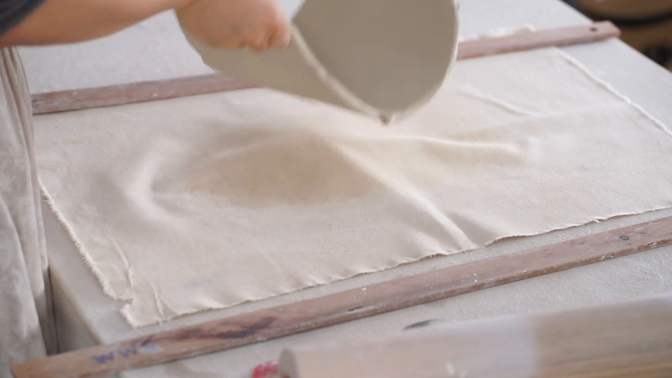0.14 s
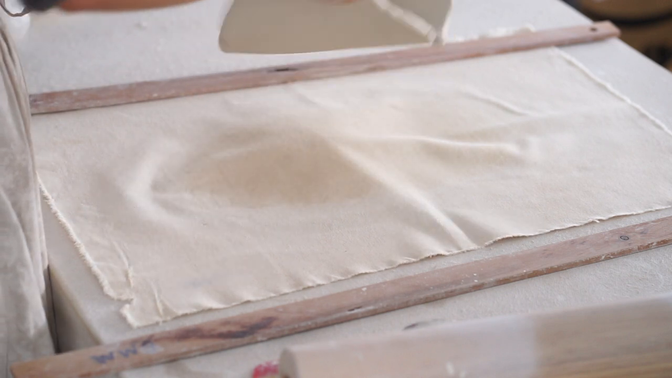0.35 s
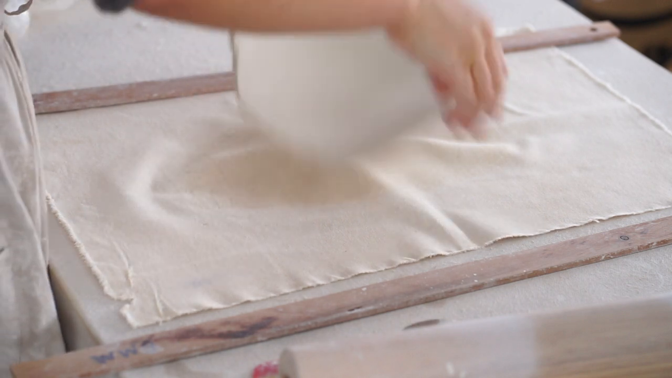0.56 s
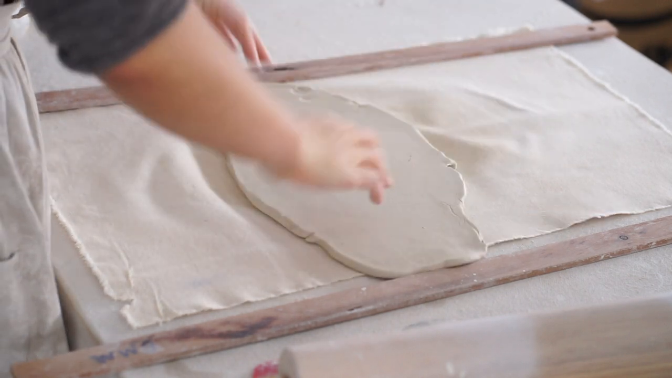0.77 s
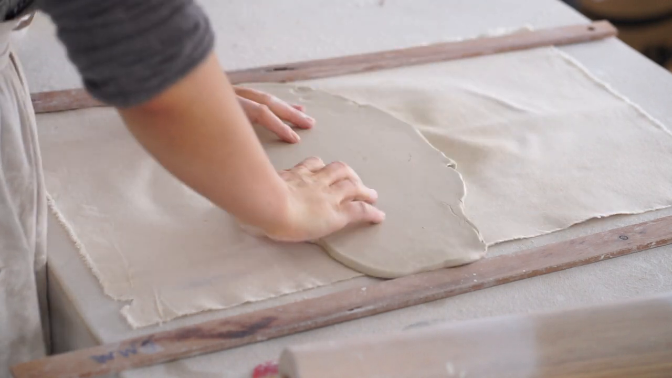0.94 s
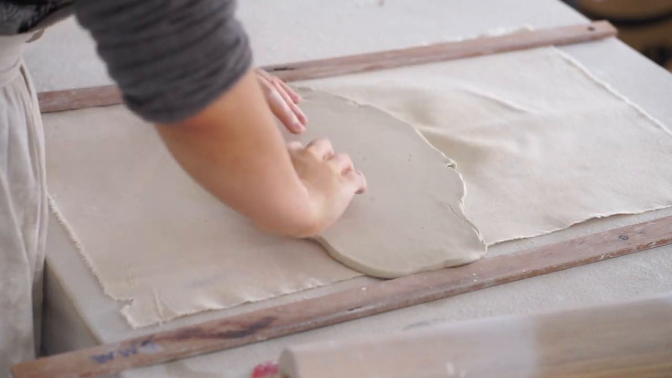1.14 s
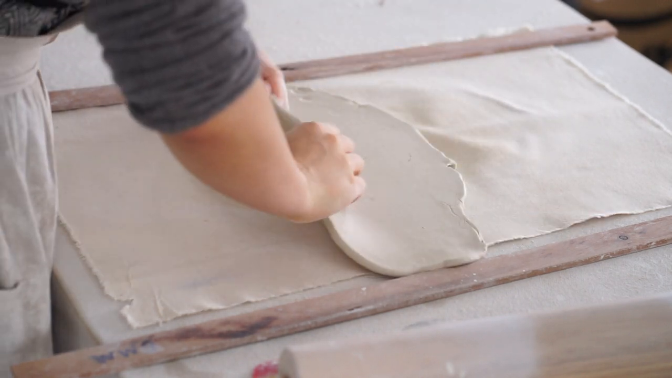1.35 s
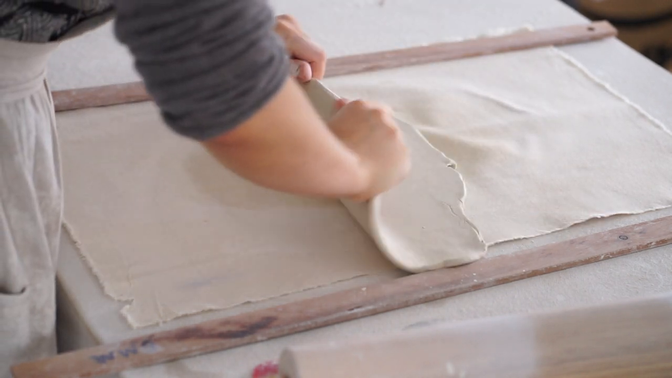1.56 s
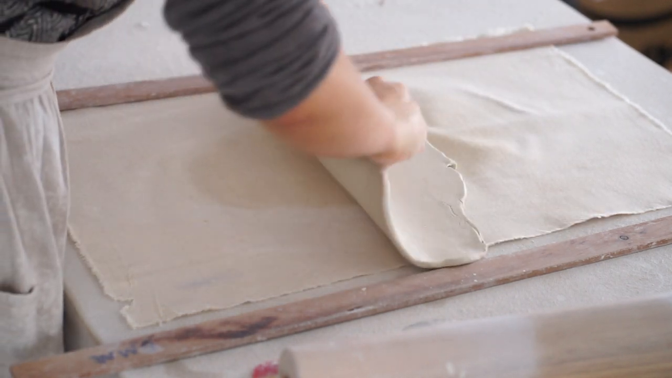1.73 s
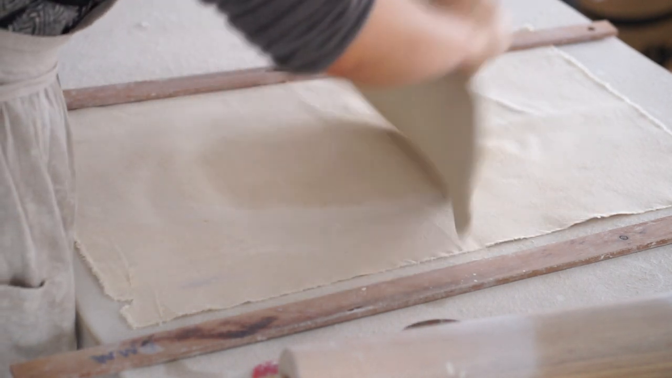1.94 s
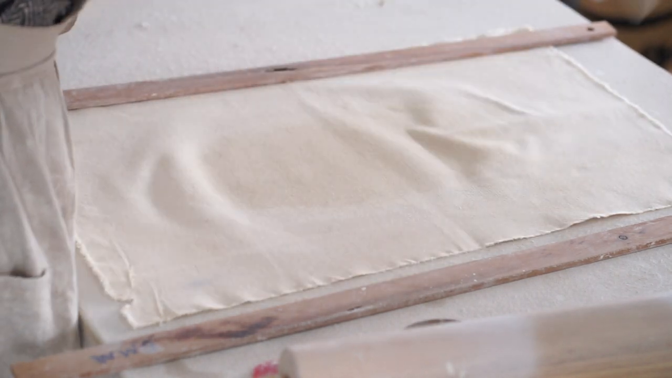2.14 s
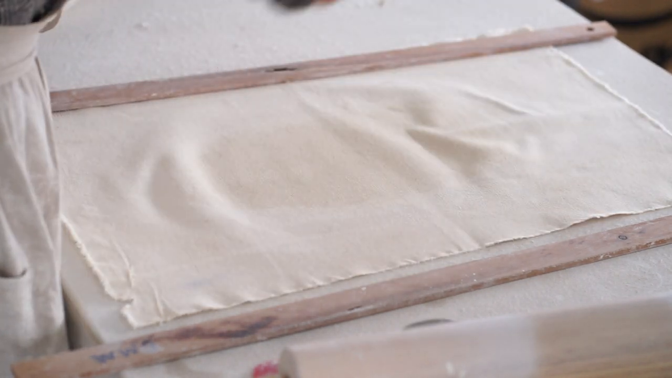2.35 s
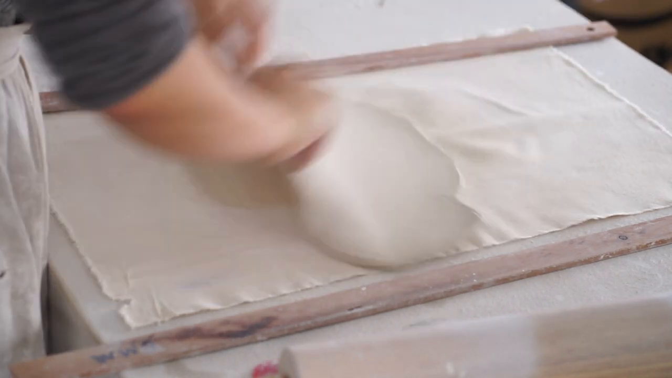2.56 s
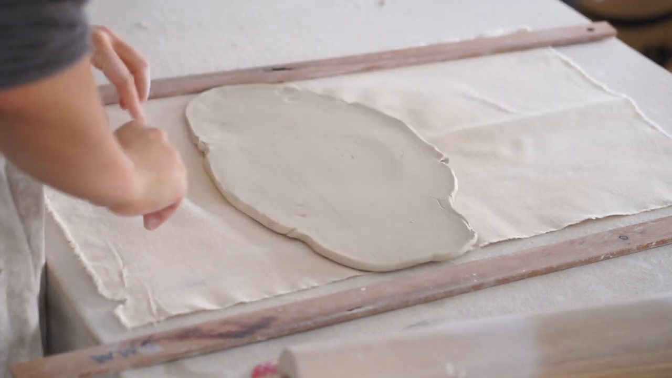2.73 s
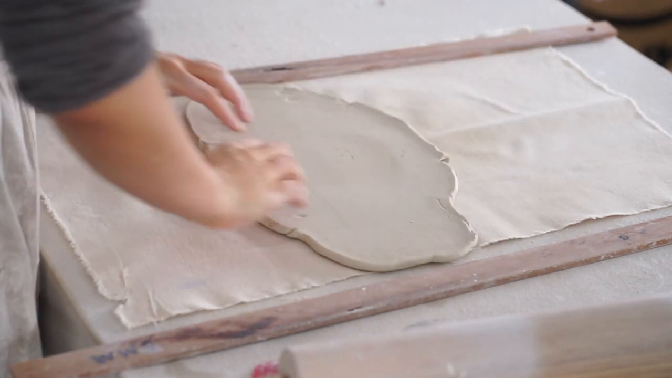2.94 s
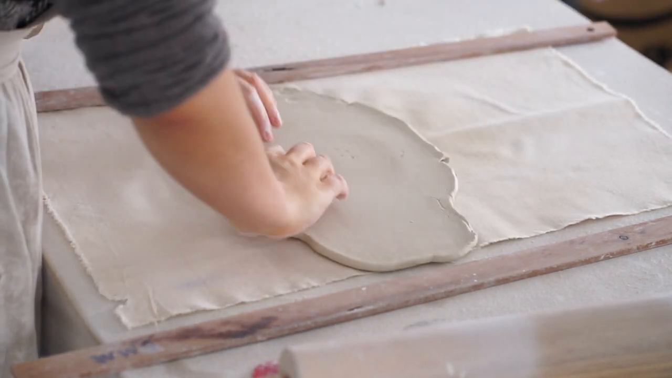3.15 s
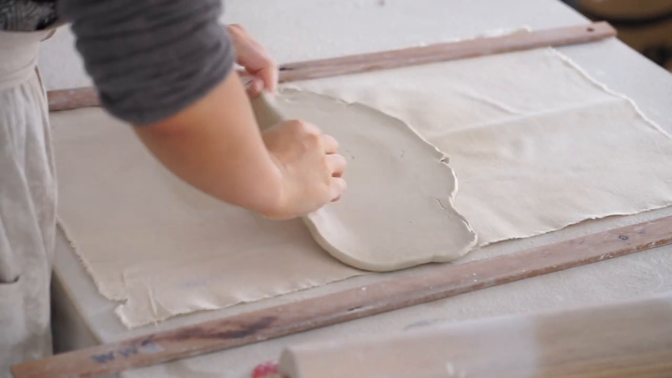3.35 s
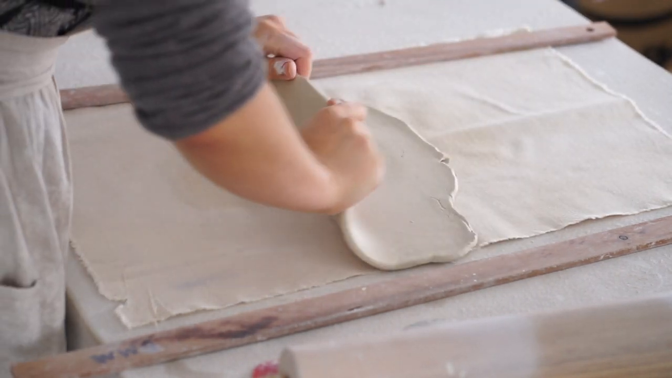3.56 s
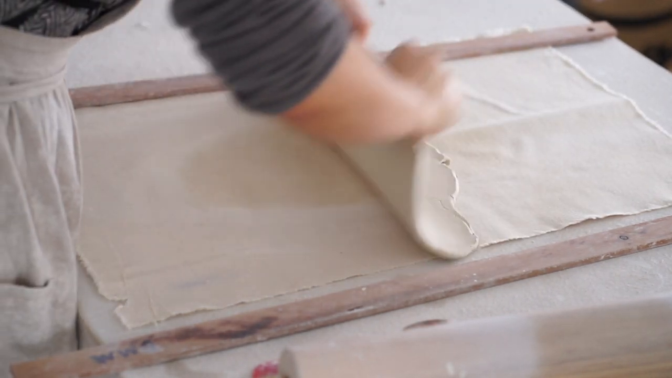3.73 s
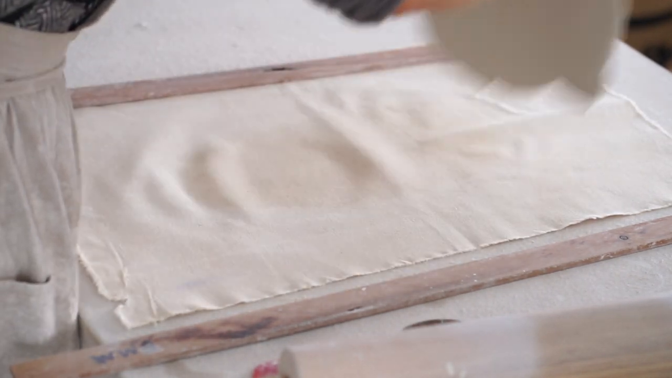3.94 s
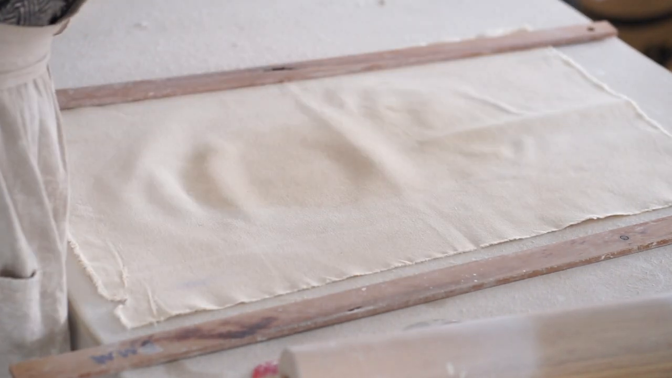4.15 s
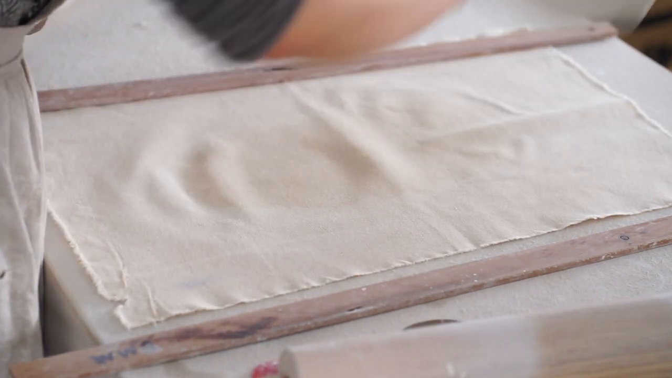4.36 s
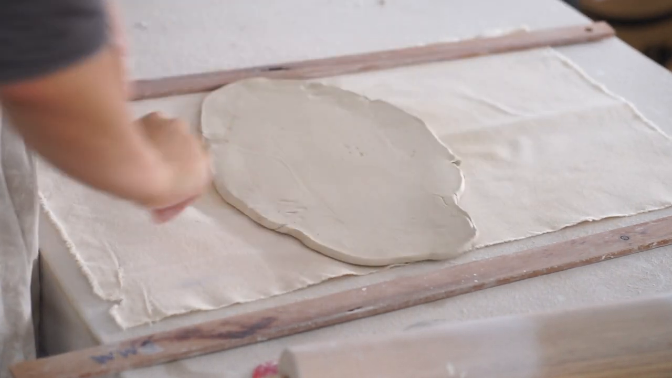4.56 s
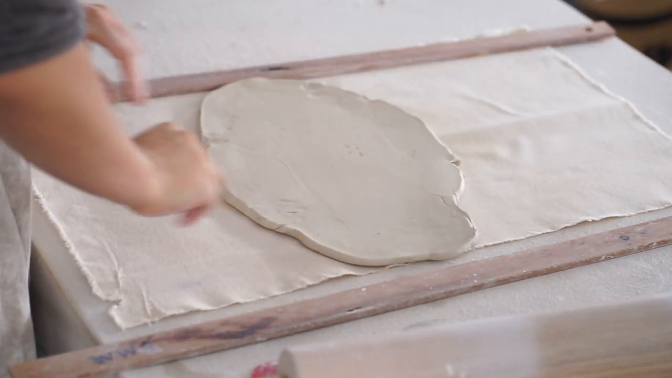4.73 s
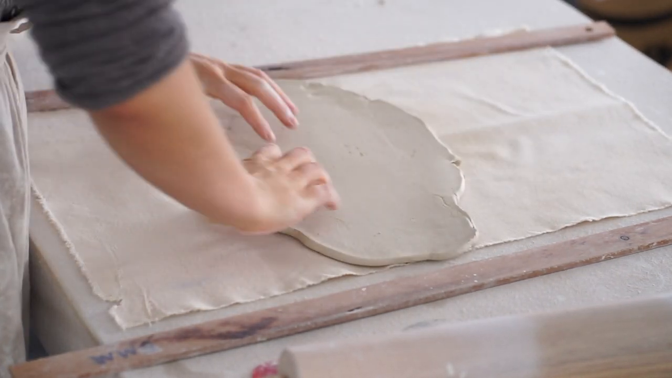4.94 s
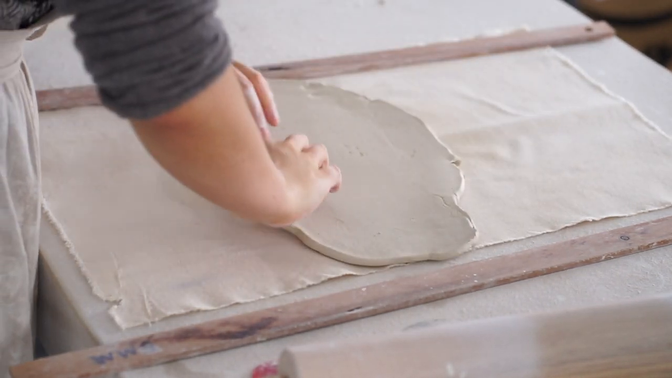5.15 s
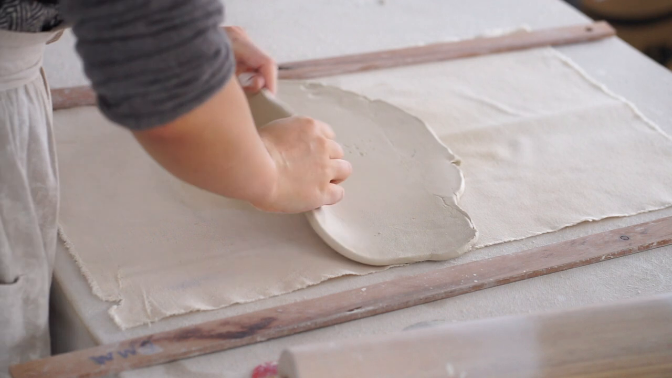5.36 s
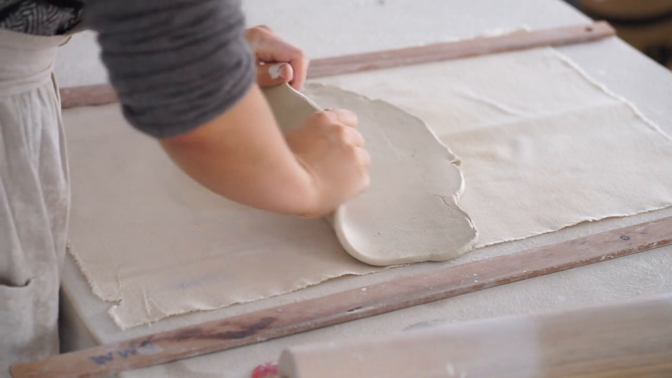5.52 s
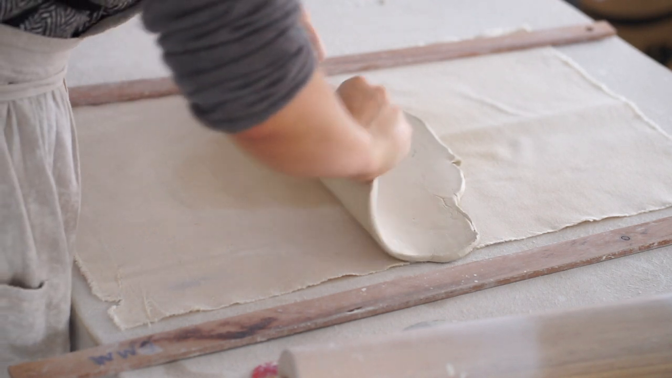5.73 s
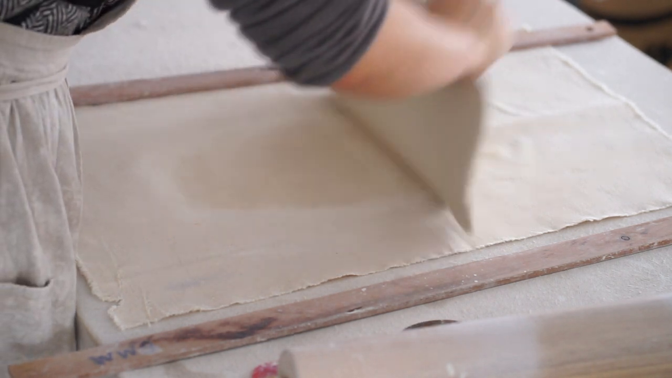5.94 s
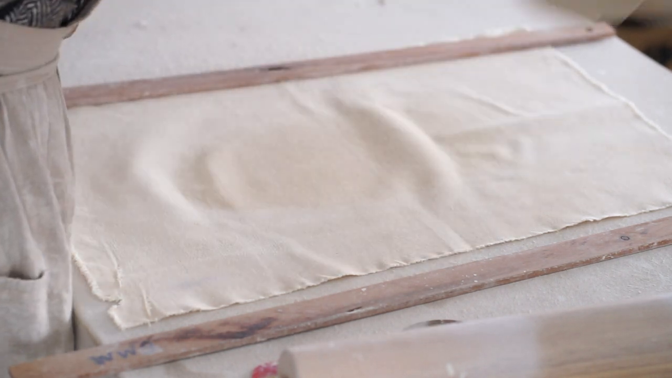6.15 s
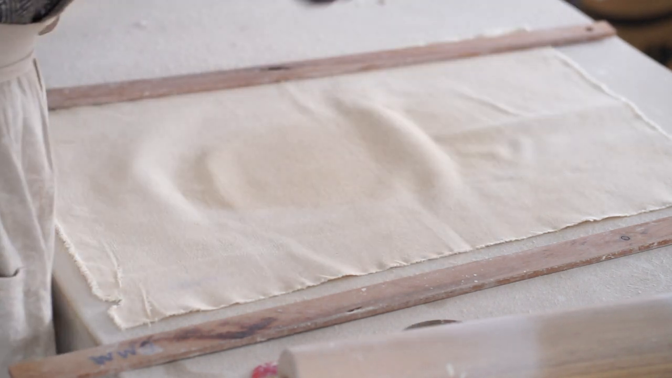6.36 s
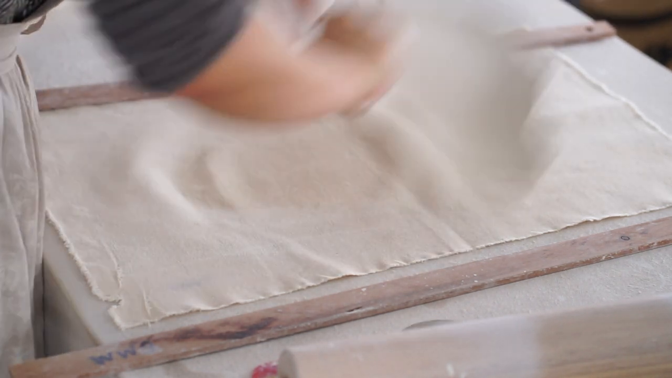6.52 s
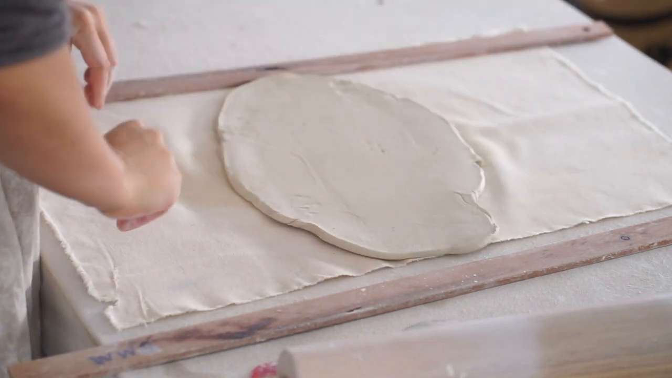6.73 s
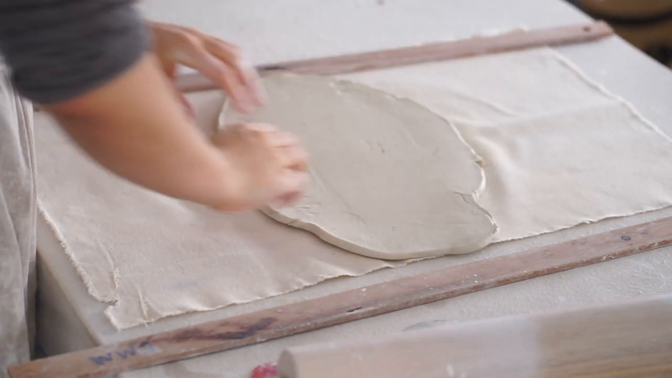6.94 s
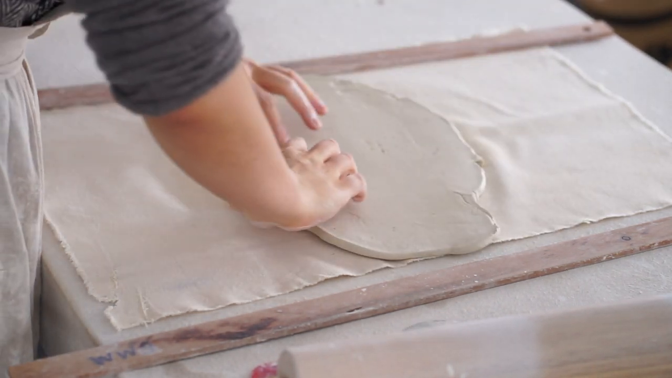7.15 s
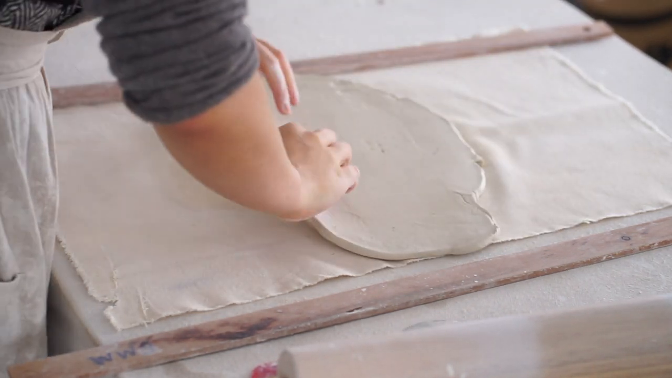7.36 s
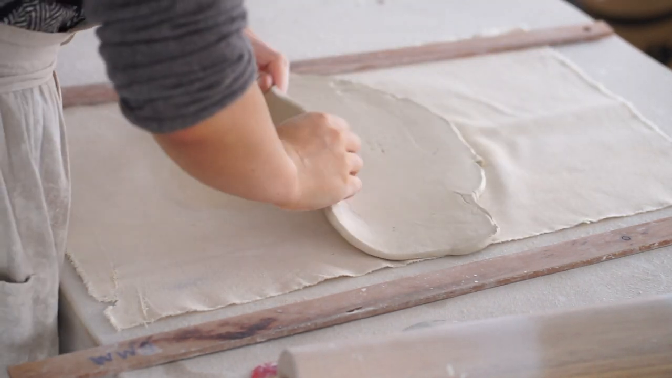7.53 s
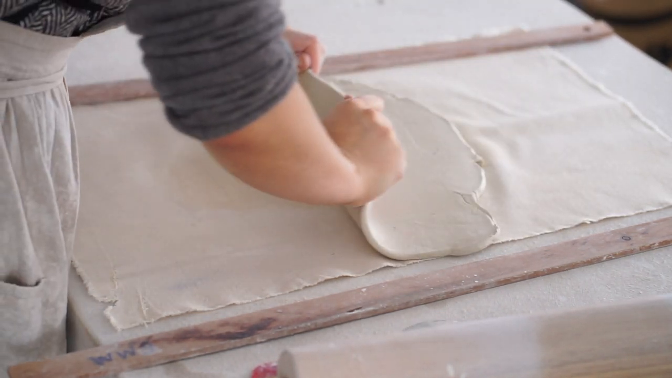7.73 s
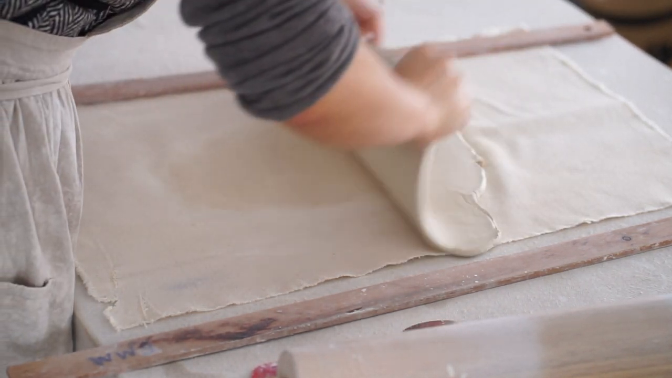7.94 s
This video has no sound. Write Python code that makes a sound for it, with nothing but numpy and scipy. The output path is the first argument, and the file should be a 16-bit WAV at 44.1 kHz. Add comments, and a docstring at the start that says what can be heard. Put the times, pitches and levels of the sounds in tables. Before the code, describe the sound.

A soft, heavy clay slab is slapped four times onto a canvas-covered board in a bare ringing room, with light brushing and dragging between throws.

```python
"""Throwing a clay slab

In a bare, ringing studio two close microphones hear a soft slab thrown four times onto a canvas-covered board.
Noise-like touches, shaped by air and clay resonances, make the edge tick, flat slap, fading flops, tail
and, on three throws, a squirt of trapped air; each blow also rings the board.
Grainy noise is the slab peeled off and dragged over canvas before each throw, and the hands brushing it after.
Faint ventilation air and hum run underneath."""
import sys
import numpy as np
from scipy import signal
from scipy.fft import rfft, irfft, next_fast_len
from scipy.io import wavfile
from scipy.ndimage import uniform_filter1d

SR = 44100
rng = np.random.default_rng(int(sys.argv[2]) if len(sys.argv) > 2 else 0)


def bounce(signal):
    """Save signal as a 16-bit WAV file at the path given by the first command-line argument."""
    frames = np.transpose(np.atleast_2d(signal))
    limited = np.clip(frames, -1, 1)
    pcm = np.round(limited * 32767).astype(np.int16)
    wavfile.write(sys.argv[1], SR, pcm)


N = 352359
HIT_SIZE = 8192  # samples in one blow or filter
TIME = np.arange(N) / SR
HIT_HZ = np.maximum(np.arange(HIT_SIZE // 2 + 1) * SR / HIT_SIZE, 1)


def undb(db):
    """Decibels to gain."""
    return 10 ** (np.asarray(db) / 20)


def at(points, hz):
    """Read a (Hz, value) table on a log-frequency axis."""
    f, value = np.transpose(points)
    return np.interp(np.log(hz), np.log(f), value)


def unit(x):
    """Scale to an energy of 1 (rms 1 over one second)."""
    return x / np.sqrt(np.sum(x ** 2) / SR)


def add(track, s, x):
    """Mix x into the track at time s."""
    i = max(int(s * SR), 0)
    track[i:i + len(x)] += x[:N - i]


def causal(gain):
    """Spectrum of the causal filter that has this gain curve."""
    # fold the cepstrum forward in time: minimum phase
    cepstrum = irfft(np.log(gain + 1e-9))
    cepstrum[1:HIT_SIZE // 2] *= 2
    cepstrum[HIT_SIZE // 2 + 1:] = 0
    return np.exp(rfft(cepstrum))


def colour(x, points):
    """Filter by a (Hz, dB) table."""
    response = irfft(causal(undb(at(points, HIT_HZ))))
    return signal.fftconvolve(x, response)[:N]


def resonance(f, hz, q):
    """Gain of one resonance at frequencies f."""
    return 1 / np.sqrt(1 + (q * (f / hz - hz / f)) ** 2)


MIC_SPACING_M = .075


def diffuse(size):
    """Spectra of noise arriving from all sides at two close microphones: alike in the bass only."""
    hz = np.maximum(np.arange(size // 2 + 1) * SR / size, 1)
    likeness = np.sinc(2 * hz * MIC_SPACING_M / 343)  # 343 m/s is the speed of sound
    shares = np.sqrt([(1 + likeness) / 2, (1 - likeness) / 2])
    mid, side = rfft(rng.standard_normal((2, size))) * shares
    return hz, np.array([mid + side, mid - side])


# Ventilation air in the studio. Each row: frequency in Hz, relative level in dB.
AIR_SPECTRUM = [(25, -15.5), (60, -13.5), (120, -12.5), (190, -10), (270, -7), (420, -5.5), (700, -4.5),
                (1000, -9), (1500, -10.5), (3000, -10.5), (6400, -14), (11000, -17.5), (15500, -23)]
AIR_DB = -66  # rms of the two microphones' average
# Hum of the ventilation. Each row: frequency in Hz, rms level in dB before the waver.
HUM_TONES = [(120, -92), (241, -80), (360.7, -80)]


def ventilation(waver=.25):
    """Steady room air, noise from all sides, with a slightly wavering mains hum of sines."""
    size = 2 * next_fast_len(N // 2 + 1)
    air = np.array([colour(noise, AIR_SPECTRUM) for noise in irfft(diffuse(size)[1])])
    air *= undb(AIR_DB) / np.std(air.mean(axis=0))
    for hz, db in HUM_TONES:
        sway = np.interp(TIME, np.linspace(0, N / SR, 40), rng.standard_normal(40))
        air += undb(db) * np.sqrt(2) * (1 + waver * sway) * np.sin(2 * np.pi * hz * TIME)
    return air


def rub(db, rise, fall, gain, grain_db=3):
    """One second of threads catching and slipping, swelling to a peak at its middle."""
    t = TIME[:SR] - .5
    grains = rng.exponential(size=SR // 20).repeat(20)  # a new grip of the threads every 20 samples
    slips = rng.standard_normal(SR) * undb(np.minimum(grain_db * grains, 12))
    swell = np.exp(-np.abs(t) / np.where(t < 0, rise, fall))
    return undb(db) * unit(irfft(rfft(slips) * gain)) * swell


# The slab peeled off and dragged over the canvas.
# Each row: peak time in seconds, peak level in dB, rise and fall time constants in seconds, pitch in Hz.
LIFT_STROKES = [(.07, -60, .2, .03, 740), (.38, -72, .1, .08, 1800), (2.0, -67, .1, .14, 1100),
                (3.88, -70, .13, .2, 1300), (6.02, -57, .05, .04, 1550)]
# Hands sliding onto the clay. Each row: first hand's peak in seconds, brush level in dB,
# drag level of the pressed slab in dB, second hand in dB relative to the first.
GRIP_STROKES = [(1.039, -61, -76, -18), (3.03, -64.5, -67, 1), (5.02, -64, -64, -3), (7.17, -67, -74, -15)]
SECOND_HAND_S, GRIP_RISE_S, GRIP_FALL_S, PRESS_HZ = .1, .04, .032, 1000
# Skin brushing clay. Each row: frequency in Hz, relative level in dB.
BRUSH_SPECTRUM = [(100, -3), (400, 0), (1500, 1.5), (3000, -2.5), (6000, -5.5), (10000, -7), (15000, -13.5)]
# Clay dragging on canvas. Each row: frequency in Hz, relative level in dB.
DRAG_SPECTRUM = [(80, -7), (400, -1), (1000, -1.5), (3000, -1), (6000, -2.5), (11000, -9.5), (15000, -11.5)]


def handling():
    """Palms brush the clay; the slab drags over the canvas as it is pressed or lifted."""
    f = np.maximum(np.arange(SR // 2 + 1), 1)
    brush = undb(at(BRUSH_SPECTRUM, f))

    def drag(hz):
        """Gain curve of the dragging slab, resonant at hz."""
        return undb(at(DRAG_SPECTRUM, f)) * resonance(f, hz, q=.9)

    strokes = [(s, rub(db, rise, fall, drag(hz))) for s, db, rise, fall, hz in LIFT_STROKES]
    for s, brush_db, drag_db, second_db in GRIP_STROKES:
        for start, hand_db in (s, 0), (s + SECOND_HAND_S, second_db):
            strokes.append((start, rub(brush_db + hand_db, GRIP_RISE_S, GRIP_FALL_S, brush)))
            strokes.append((start, rub(drag_db + hand_db, GRIP_RISE_S, GRIP_FALL_S, drag(PRESS_HZ))))
    out = np.zeros(N + SR)
    for s, stroke in strokes:
        out[int(s * SR):int(s * SR) + SR] += stroke
    return out[SR // 2:SR // 2 + N]  # puts each peak at its table time


def contact(length, count=3):
    """Many tiny touches spread over this length, which together push equally at all frequencies."""
    gate = np.exp(-(TIME[:HIT_SIZE] / length) ** 4)
    push = rng.standard_normal(HIT_SIZE) * gate
    for _ in range(count):
        flat = irfft(np.exp(1j * np.angle(rfft(push))))
        push = flat * np.sqrt(gate)
    return push


def strike(push, gain):
    """The sound of a push through this gain curve; energy 1."""
    return unit(irfft(rfft(push) * causal(gain)))


def cushion(hz, q, soft_ratio):
    """Air squeezed under clay rings at one pitch; the soft clay muffles what lies well above it."""
    return resonance(HIT_HZ, hz, q) / np.sqrt(1 + (HIT_HZ / (hz * soft_ratio)) ** 6)


# Wet clay cracking on cloth. Each row: frequency in Hz, relative level in dB.
CRACK_SPECTRUM = [(100, -20.5), (800, -8.5), (1800, 3), (3000, -1.5), (5000, -5), (7000, -11), (10000, -17),
                  (12500, -26.5), (15500, -36.5)]


def cracking(body, crack_db):
    """Gain curve of a ringing body of air together with wet clay cracking on cloth."""
    crack = unit(undb(at(CRACK_SPECTRUM, HIT_HZ)))
    return np.hypot(unit(body), undb(crack_db) * crack)


def pop(hz, q, crack_db):
    """Gain curve of a small piece of clay meeting or leaving the cloth."""
    return cracking(cushion(hz, q, soft_ratio=1.8), crack_db)


# The blow functions below list (start in s, energy in dB, contact length in s, gain curve).
def release():
    """The sticky slab lets go of the cloth with a small resonant knock."""
    return [(.078, -62.5, .006, pop(hz=770, q=2.4, crack_db=-16))]


# The leading edge touching the canvas.
# Each row: start in seconds, energy in dB, length in seconds, brightness in dB per octave.
EDGE_TICKS = [(0.646, -58.5, .007, -1.3), (2.5964, -46, .011, 0), (4.4971, -40, .006, -2),
              (6.6032, -40.5, .021, -.7)]
# The slab's edge. Each row: frequency in Hz, relative level in dB before the brightness tilt.
EDGE_SPECTRUM = [(60, -23), (300, -3.5), (900, 2.5), (1600, 1.5), (3000, -4), (6000, -11.5), (10000, -21.5),
                 (15500, -38)]


def edge_ticks():
    """The thin edge ticks down as a short touch, each time with its own spectral tilt."""
    blows = []
    for s, db, length, tilt_db in EDGE_TICKS:
        gain = undb(at(EDGE_SPECTRUM, HIT_HZ) + tilt_db * np.log2(HIT_HZ))
        blows.append((s, db, length, gain))
    return blows


# The face landing and the slab unrolling. Each row: start in seconds, energy in dB, air cushion pitch in Hz,
# thud pitch in Hz, thud in dB relative to the cushion, crack in dB relative to the body,
# first fold's energy in dB before scatter, its pitch in Hz before scatter,
# pitch sag in octaves per second, unrolling time in seconds.
FACE_SLAPS = [(0.657, -35, 930, 260, -4.5, -18.5, -51, 850, 0, .034),
              (2.6097, -31.7, 740, 330, -5.5, -19, -39.4, 1300, 30, .078),
              (4.5034, -29.8, 850, 300, -9, -13.5, -38.3, 830, 0, .08),
              (6.6160, -31.8, 1060, 270, -7, -14, -42.5, 690, 20, .046)]


def slaps():
    """The face squeezes its air cushion while the weight thuds; folds follow it down."""
    blows = []
    for s, db, hz, thud_hz, thud_db, crack_db, fold_db, fold_hz, sag, unroll_s in FACE_SLAPS:
        thud = unit(cushion(thud_hz, q=1.8, soft_ratio=2.4))  # the slab's weight arriving
        face = np.hypot(unit(cushion(hz, q=1.7, soft_ratio=3.1)), undb(thud_db) * thud)
        blows.append((s, db, .0125, cracking(face, crack_db)))
        blows += folds(s, fold_db, fold_hz, sag, unroll_s)
    return blows


FOLD_AFTER_S, FOLD_GAP_S, FOLD_FADE_DB_PER_S = .02, .012, 60
FOLD_SCATTER_S, FOLD_SCATTER_OCTAVES, FOLD_SCATTER_DB = .002, .15, .7  # standard deviations


def folds(s, db, hz, sag, unroll_s, count=7):
    """The slab unrolls behind its face in uneven flops that tend to weaken and sink in pitch, then stop."""
    blows = []
    for k, (late, high, loud) in enumerate(rng.standard_normal((count, 3))):
        age = k * FOLD_GAP_S
        if FOLD_AFTER_S + age < unroll_s:
            start = s + FOLD_AFTER_S + age + FOLD_SCATTER_S * late
            fold_hz = hz * 2 ** (FOLD_SCATTER_OCTAVES * high - sag * age)
            fold_db = db - FOLD_FADE_DB_PER_S * age + FOLD_SCATTER_DB * loud
            blows.append((start, fold_db, .005, pop(fold_hz, q=1.3, crack_db=-20)))
    return blows


# The heavy tail of the slab landing. Each row: start in seconds, energy in dB, pitch in Hz.
TAIL_LANDINGS = [(0.6839, -42.5, 330), (2.6408, -37, 490), (4.536, -40, 320), (6.6464, -37.7, 380)]


def tails():
    """About 30 ms after each slap, a heavier part of the slab lands with a low-pitched pop of air."""
    return [(s, db, .0025, pop(hz, q=2.5, crack_db=-25)) for s, db, hz in TAIL_LANDINGS]


# Trapped air leaving under the rim. Each row: start in seconds, energy in dB, length in seconds,
# crack in dB relative to the body, whistle from 0 to 1 (scales the sharpness of the gap).
AIR_SQUIRTS = [(0.668, -53.5, .006, 8, .3), (4.553, -40.5, .05, -10, .4), (6.6658, -37.3, .028, -13, .9)]
# The gap it leaves by. Each row: resonance in Hz, Q at full whistle, relative level in dB.
GAP_RESONANCES = [(2190, 6, 0), (2750, 4, -3), (3900, 18, -4), (8380, 30, -23), (9370, 30, -26)]


def squirts():
    """Air squirting from under the rim excites the resonances of the narrow gap."""
    blows = []
    for s, db, length, crack_db, whistle in AIR_SQUIRTS:
        gap = []
        for hz, q, ring_db in GAP_RESONANCES:
            gap.append(undb(ring_db) * unit(cushion(hz, q * whistle, soft_ratio=1.7)))
        blows.append((s, db, length, cracking(np.linalg.norm(gap, axis=0), crack_db)))
    return blows


# Spots on the table. Each entry: how many samples later the sound reaches the left microphone than the right.
SPOT_LAGS = [1, 0, 2, 1, 3]


def clay():
    """All blows of the slab; one track for each spot on the table."""
    blows = release() + edge_ticks() + slaps() + tails() + squirts()
    spots = np.zeros((len(SPOT_LAGS), N))
    for k, (s, db, length, gain) in enumerate(blows):
        # the slab is wide, so the blows take the spots in turn
        add(spots[k % len(spots)], s, undb(db) * strike(contact(length), gain))
    return spots


# The board under the canvas. Each row: mode in Hz, level in dB, t60 decay in seconds.
BOARD_MODES = [(64.95, -6, .9), (86, -12, .6), (140, -8, .25), (195, -10.5, 0.45), (292, -10.5, 0.36),
               (426, -9.5, 0.25), (510, -14.5, 0.16), (626, -13.5, 0.048), (779.05, -4.5, 0.053),
               (1010.4, -10.5, 0.2), (991.6, -10.5, 0.065), (1222.8, -10, .1), (1587, -13, 0.25)]


def board(blows):
    """Every blow sets the wooden board ringing in decaying modes."""
    t = TIME[:SR // 2]
    ring = 0
    for hz, db, t60 in BOARD_MODES:
        fall = np.log(1000) / t60
        strength = undb(db) * 2 * fall / SR  # the level holds at resonance, whatever the decay
        ring = ring + strength * np.exp(-fall * t) * np.cos(2 * np.pi * hz * t)
    return blows + signal.oaconvolve(blows, ring)[:N]


def dying(t, t60, linger_db=-23, linger_ratio=1.7):
    """Echoes near the table fade fast; a faint share lingers in the far part of the studio."""
    fall = np.log(1000) * t / t60
    return np.hypot(np.exp(-fall), undb(linger_db) * np.exp(-fall / linger_ratio))


# Decay of the studio. Each row: frequency in Hz, t60 of the main fade in seconds.
STUDIO_T60 = [(80, 0.535), (210, 0.5331), (560, 0.5237), (1470, 0.5068), (3880, 0.4302), (10200, 0.3683),
              (16000, 0.0012)]
# Echoes of the studio. Each row: frequency in Hz, echo level in dB.
STUDIO_ECHO = [(60, -2), (95, -9), (150, -3.5), (280, -2), (450, -.8), (900, -0.5), (1500, .7), (2200, 2.5),
               (4500, 0), (12000, 3.2)]


def studio(x, lag, gap_s=.003, build_s=0.0042, patchy_db=2, count=19):
    """The direct sound from one spot, then its own dense wall echoes, which die sooner in the treble."""
    t = TIME[:SR]
    hz, field = diffuse(SR)
    centres = np.geomspace(40, 16000, count)
    tail = 0
    for centre, share in zip(centres, np.eye(count)):
        band = irfft(field * np.interp(np.log(hz), np.log(centres), share))
        # even out the band's strength before it fades
        power = uniform_filter1d(np.mean(band ** 2, axis=0), int(SR * (.025 + 6 / centre)))
        band = band * np.sqrt(power.mean() / power)
        fade = dying(t, at(STUDIO_T60, centre)) * np.clip((t - gap_s) / build_s, 0, 1)
        tail = tail + band * unit(fade) * undb(at(STUDIO_ECHO, centre)) / np.sqrt(SR)
    # single walls stand out as clumps among the echoes
    patches = rng.standard_normal(SR // 100).repeat(100)
    clumps = undb(patchy_db * uniform_filter1d(patches, size=40))
    response = tail * clumps / np.sqrt(np.mean(clumps ** 2))
    # direct sound: left after its lag, right at once
    response[0, lag] += 1
    response[1, 0] += 1
    return signal.oaconvolve(x[None], response, axes=1)[:, :N]


# Balance of the microphones for clay and hands. Each row: frequency in Hz, left minus right in dB.
MIC_BALANCE = [(100, 0.1172), (500, 1.1306), (1500, 0), (4000, -0.6547), (8000, -3), (14000, -2.5)]


def scene():
    """The work table lies a little to the right of the microphones."""
    throws = sum(studio(board(spot), lag) for spot, lag in zip(clay(), SPOT_LAGS))
    left, right = throws + studio(handling(), SPOT_LAGS[0])
    half = np.array(MIC_BALANCE) * [1, .5]  # half the difference goes to each side
    balanced = np.array([colour(left, half), colour(right, half * [1, -1])])
    return balanced + ventilation()


LOW_CUT_HZ, TOP_HZ = 52, 15750


def record(dry):
    """The recorder rounds the tallest peaks, thins the rumble and cuts the top."""
    rounded = dry / (1 + dry ** 6) ** (1 / 6)
    low_cut = signal.butter(3, LOW_CUT_HZ, "high", fs=SR, output="sos")
    top_cut = signal.ellip(10, .1, 80, TOP_HZ, fs=SR, output="sos")
    return signal.sosfilt(top_cut, signal.sosfilt(low_cut, rounded))


dry = scene()
out = record(dry)
bounce(out)
```